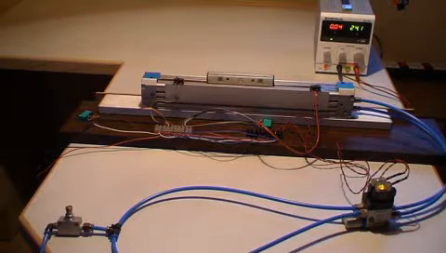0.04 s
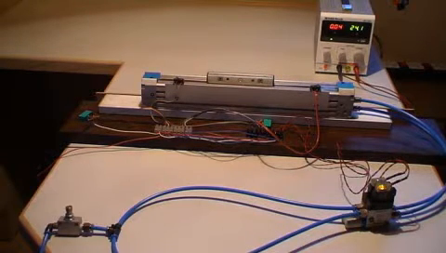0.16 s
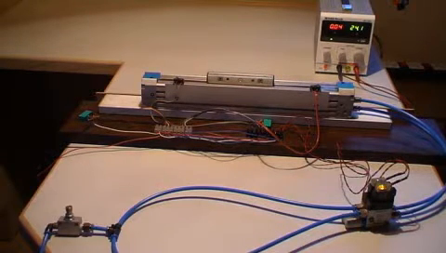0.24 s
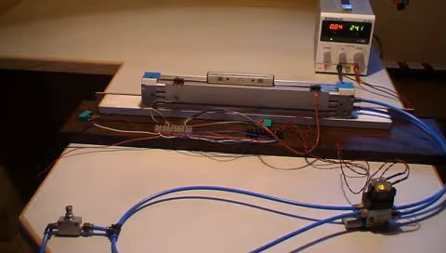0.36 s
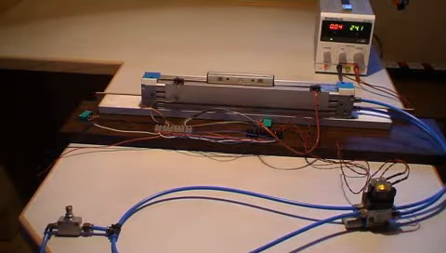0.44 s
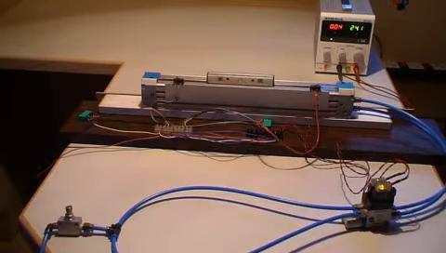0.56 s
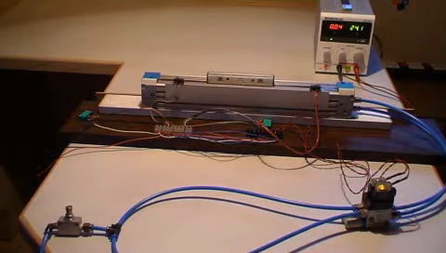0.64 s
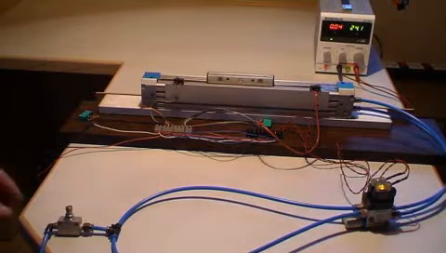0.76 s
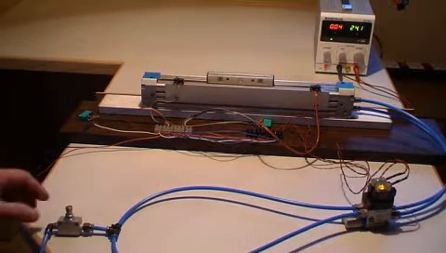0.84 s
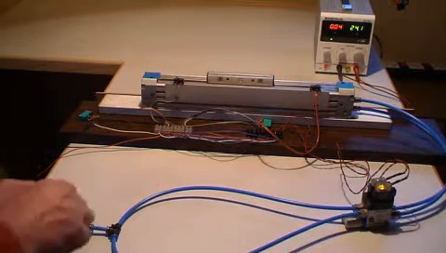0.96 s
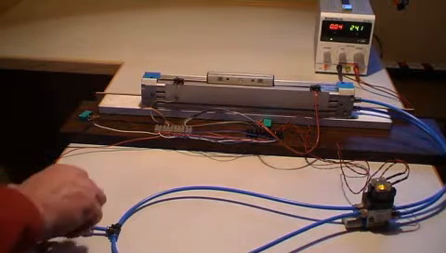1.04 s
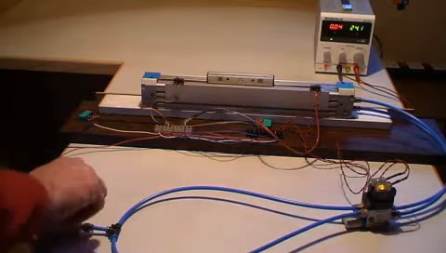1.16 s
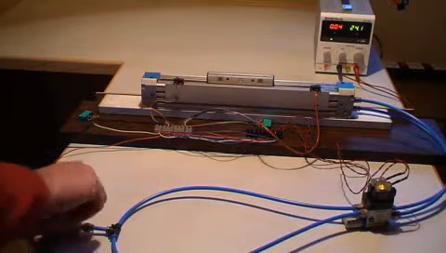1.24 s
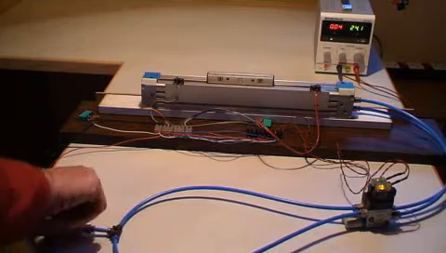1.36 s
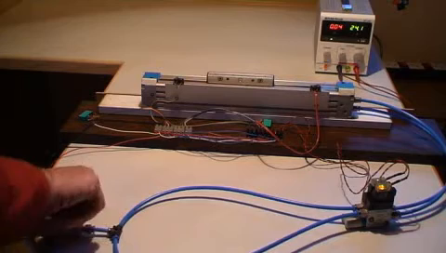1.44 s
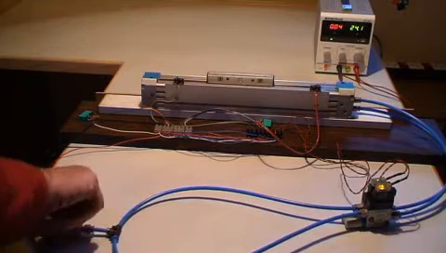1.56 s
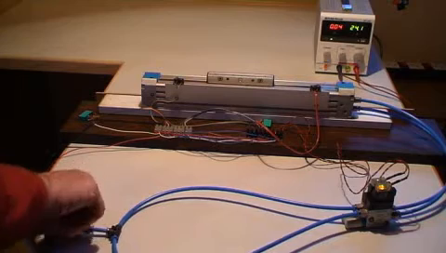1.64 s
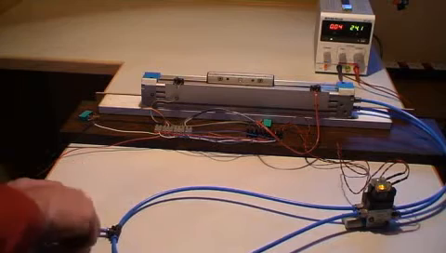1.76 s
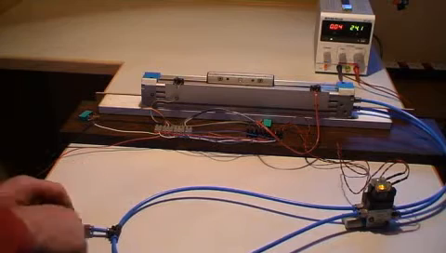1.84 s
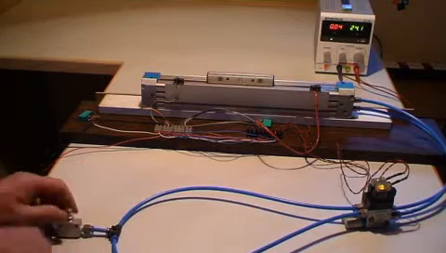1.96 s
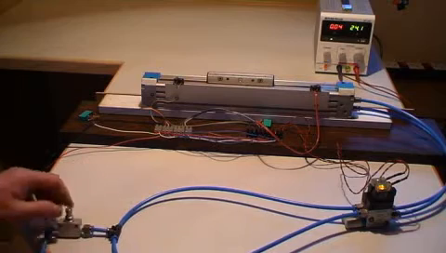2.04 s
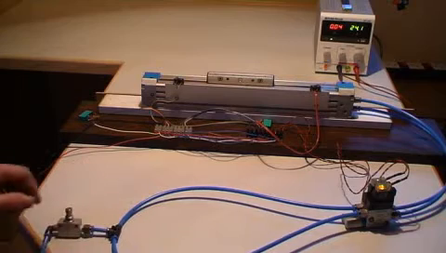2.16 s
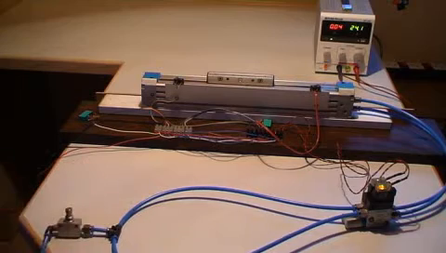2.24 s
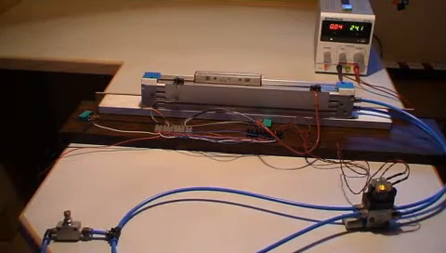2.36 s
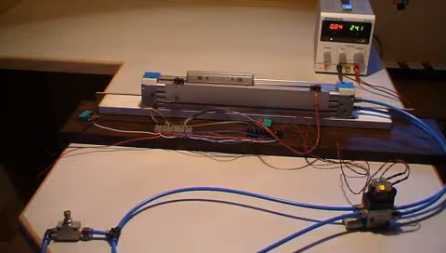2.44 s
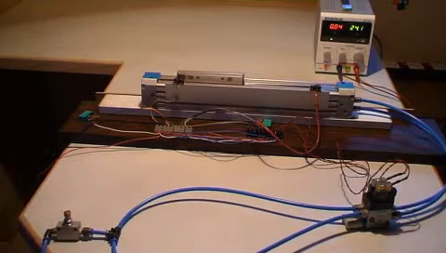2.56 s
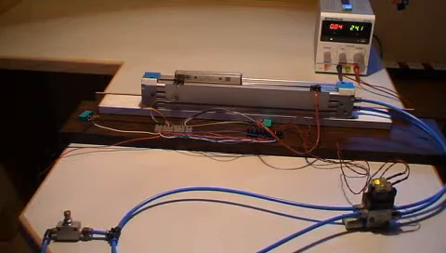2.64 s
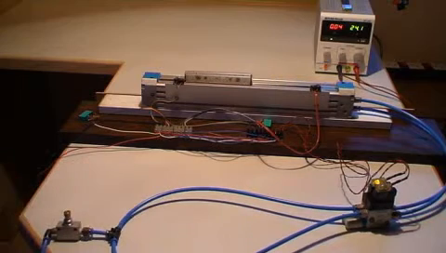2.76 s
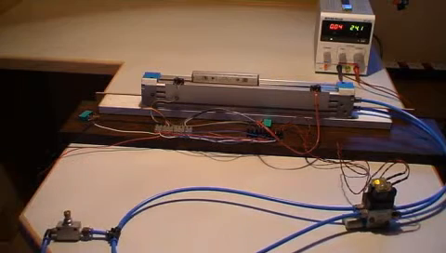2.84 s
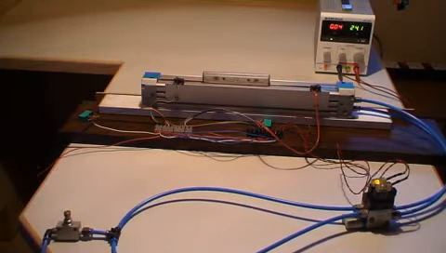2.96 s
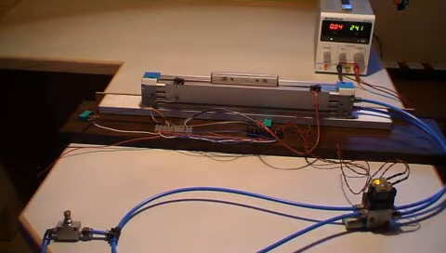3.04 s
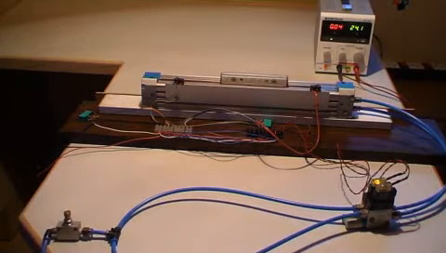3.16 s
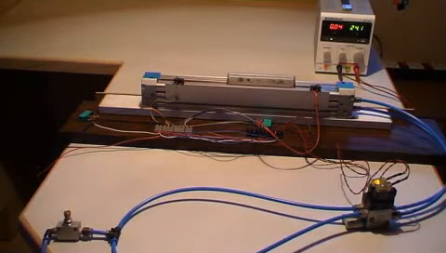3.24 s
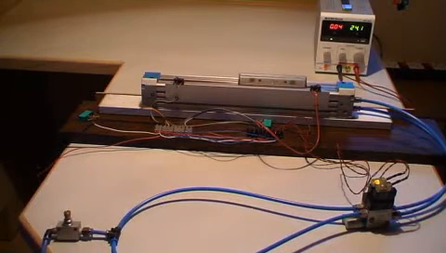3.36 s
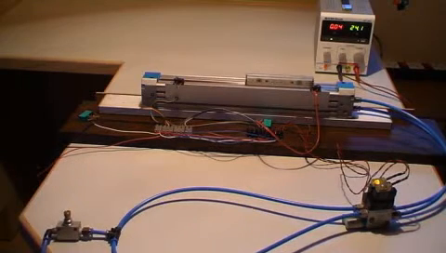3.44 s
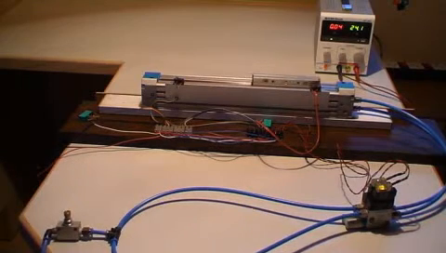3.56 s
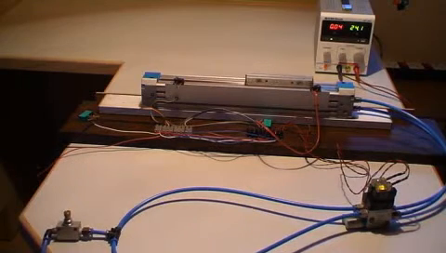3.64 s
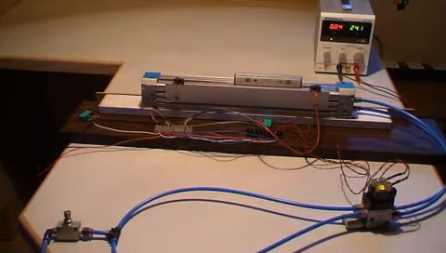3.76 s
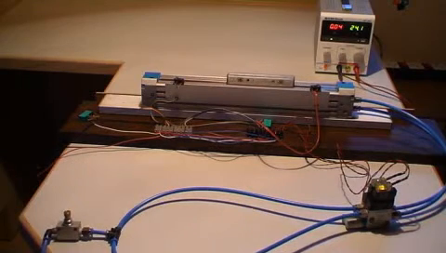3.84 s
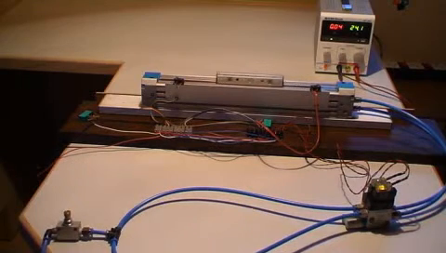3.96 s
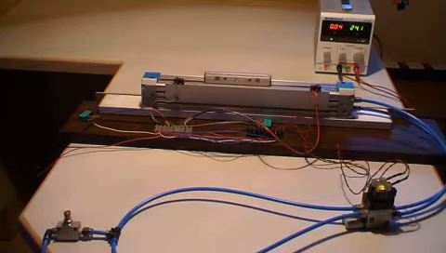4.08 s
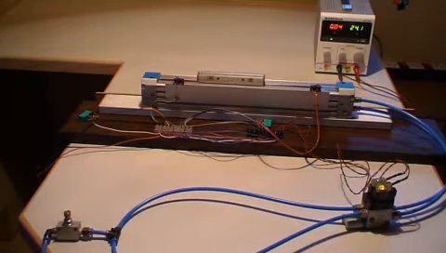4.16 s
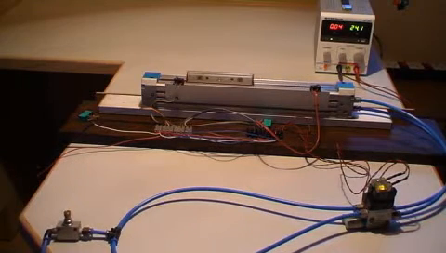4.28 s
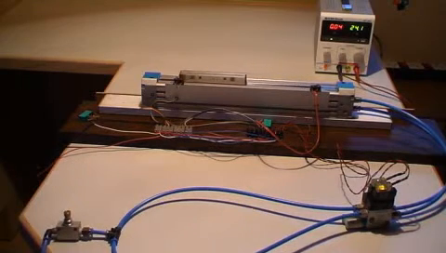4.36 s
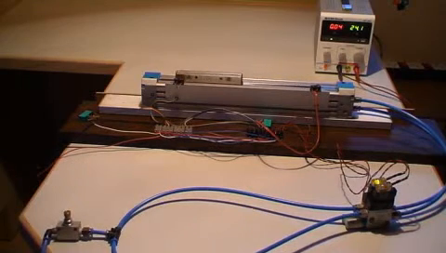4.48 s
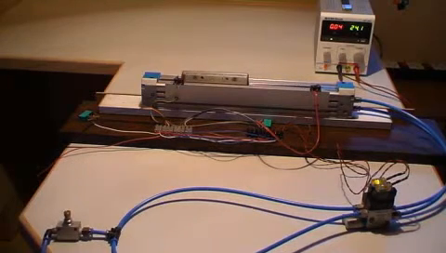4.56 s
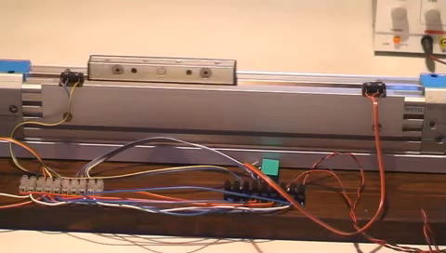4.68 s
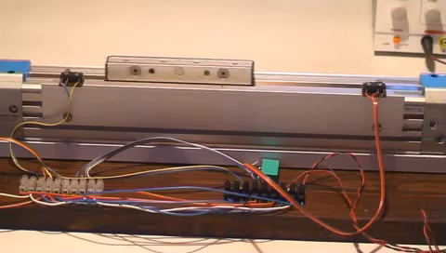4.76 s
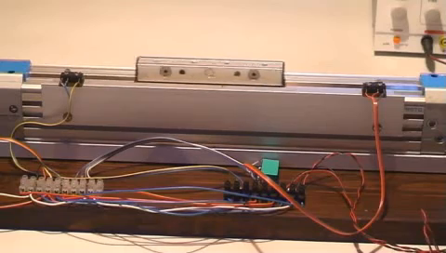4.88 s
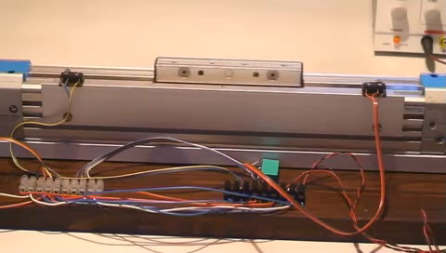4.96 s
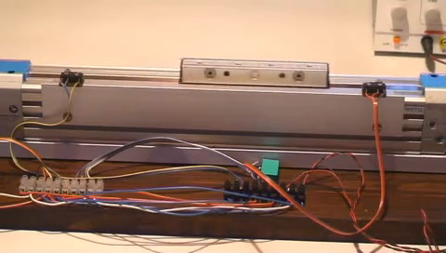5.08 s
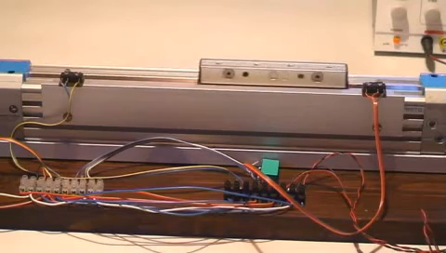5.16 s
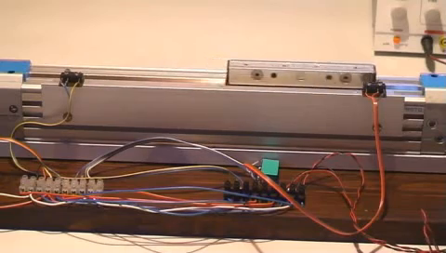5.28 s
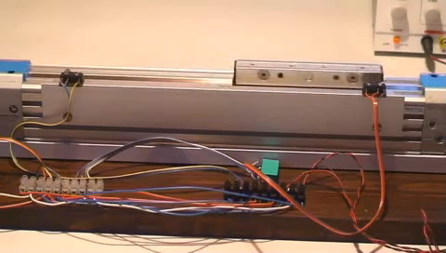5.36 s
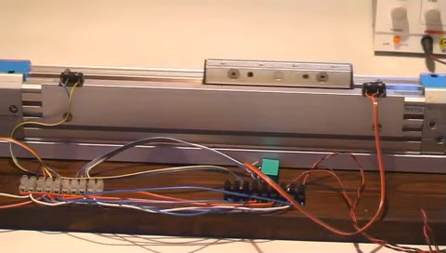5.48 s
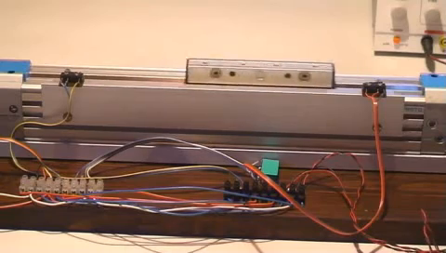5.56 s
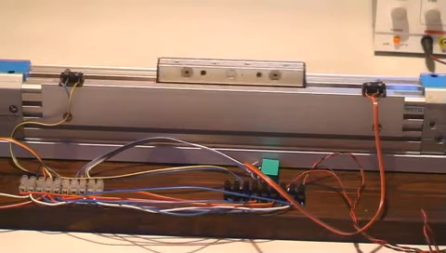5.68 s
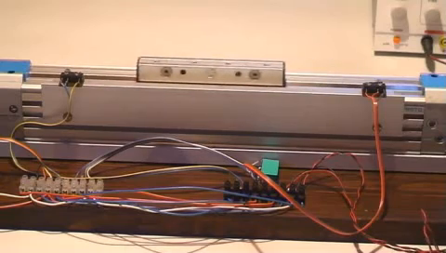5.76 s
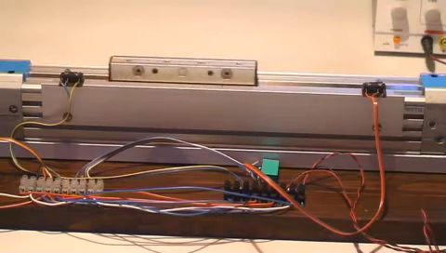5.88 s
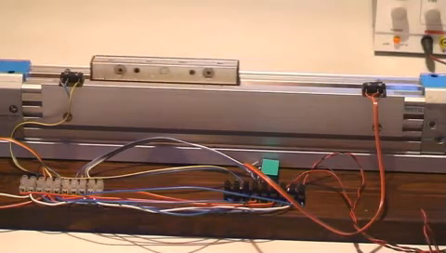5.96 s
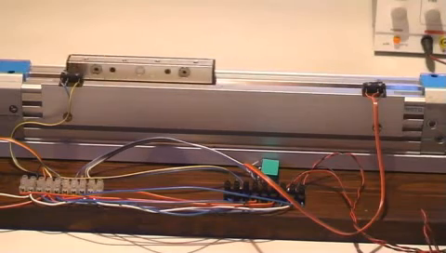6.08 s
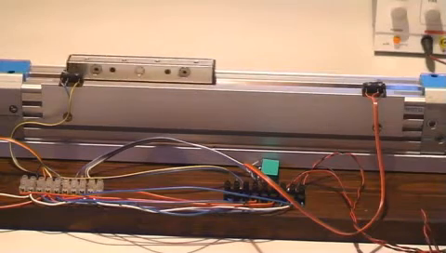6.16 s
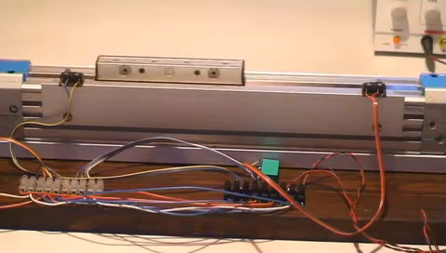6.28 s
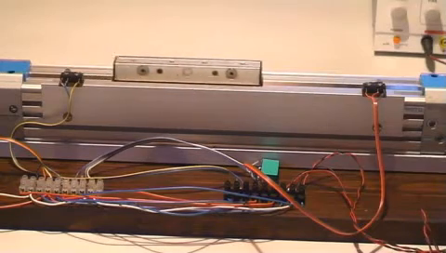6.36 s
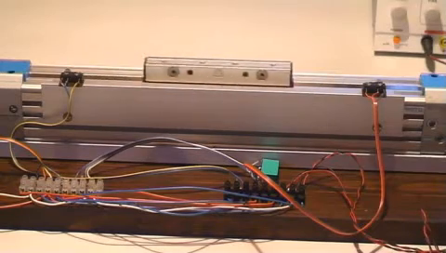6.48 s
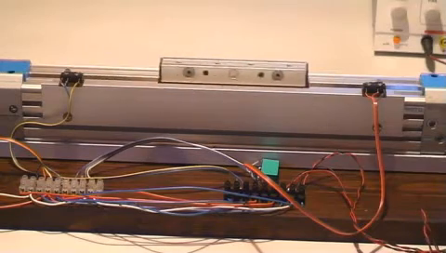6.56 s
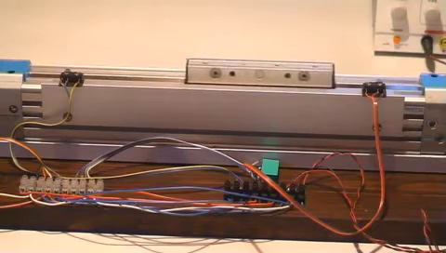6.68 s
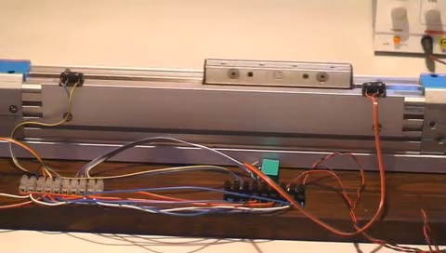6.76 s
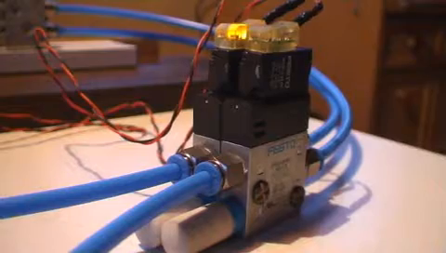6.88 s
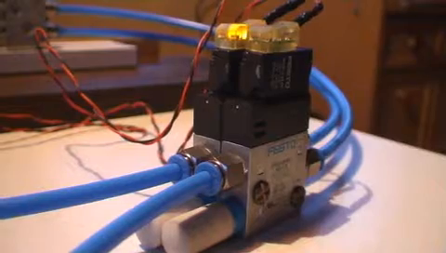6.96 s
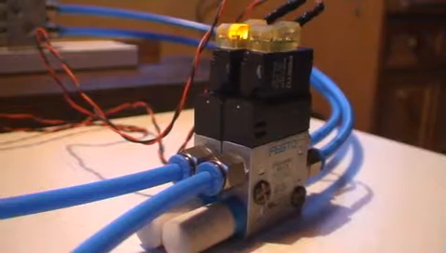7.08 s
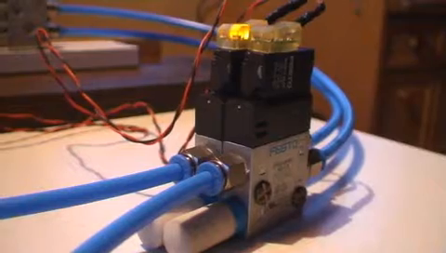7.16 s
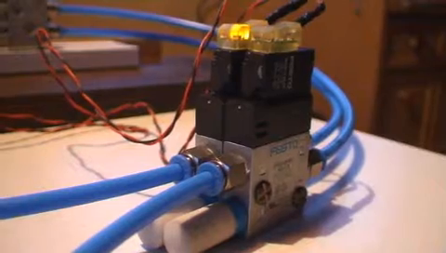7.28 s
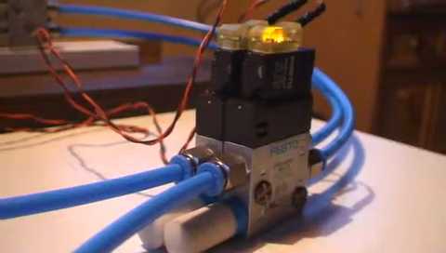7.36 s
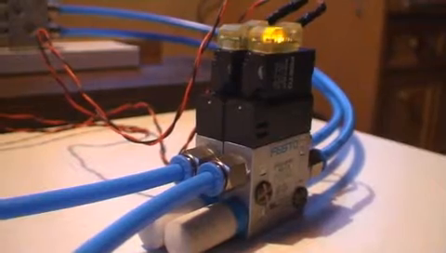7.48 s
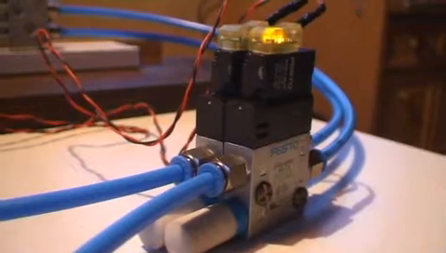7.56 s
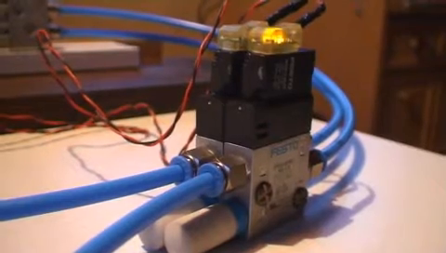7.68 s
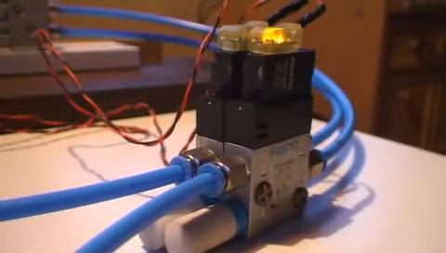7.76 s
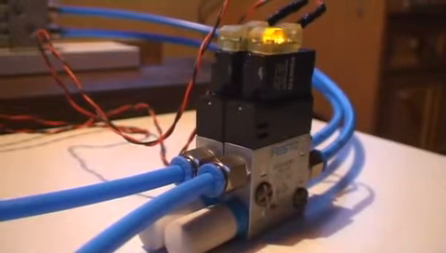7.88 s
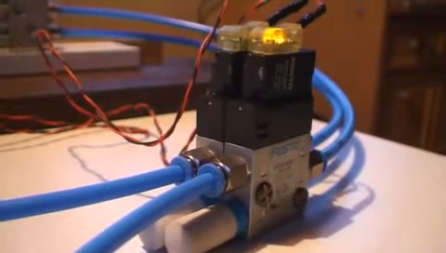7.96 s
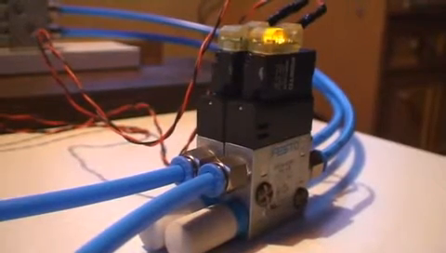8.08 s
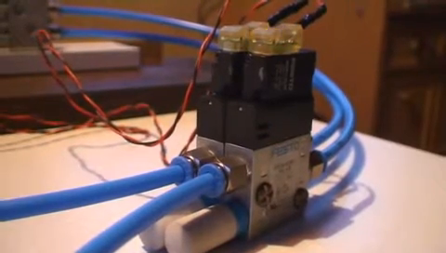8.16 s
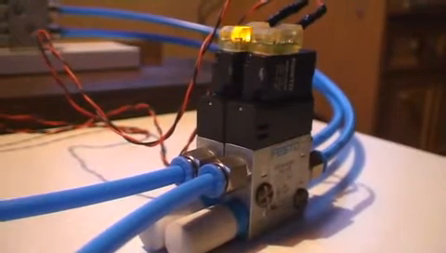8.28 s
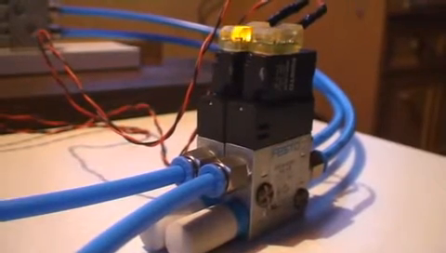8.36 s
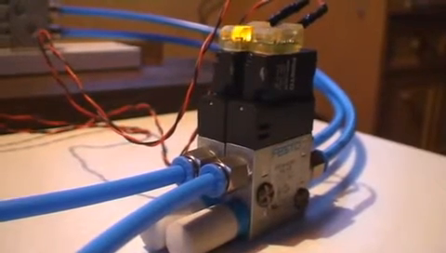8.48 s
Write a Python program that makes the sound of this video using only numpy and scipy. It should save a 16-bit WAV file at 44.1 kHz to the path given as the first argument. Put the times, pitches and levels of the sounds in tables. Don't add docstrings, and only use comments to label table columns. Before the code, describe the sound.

A bench pneumatic drive heard fairly close in a small room. After quiet fumbling on the microphone and two faint puffs, background hiss steps up and seven reversals follow in a steady rhythm. Each is a tight cluster of metallic ticks, a hollow thump and a quick, sputtering air exhaust that shakes the bench, ending with a crisp double click. Alternate ends differ slightly in resonance; the hiss is broad and out of phase.

```python
import sys
import numpy as np
from scipy import signal
from scipy.fft import rfft, irfft, next_fast_len
from scipy.io import wavfile

SR = 44100
rng = np.random.default_rng(int(sys.argv[2]) if len(sys.argv) > 2 else 0)


def store_pcm(level_fs):
    pcm = np.round(np.clip(level_fs, -1, 1) * 32767).astype(np.int16)
    wavfile.write(sys.argv[1], SR, np.atleast_2d(pcm).T)


def invert_db(level):
    return 10 ** (np.asarray(level, dtype=float) / 20)


N = 376173
TIME = np.arange(N) / SR
BANDS_HZ = 60 * 2 ** np.arange(0, 8.1, .5)

# spool_s, vent_s
REVERSALS = [
    (2.603, 2.6395),
    (3.545, 3.574),
    (4.446, 4.472),
    (5.398, 5.427),
    (6.323, 6.3495),
    (7.299, 7.329),
    (8.247, 8.274),
]
# spool_db, vent_db
STRENGTH = [
    (-36.5, -30),
    (-41, -32.5),
    (-38.5, -28.5),
    (-39.5, -32),
    (-39.5, -28),
    (-41, -31.5),
    (-38.5, -28),
]
# pitch_hz, level_db (per Hz)
LEFT_JET = [(60, -41), (150, -10), (300, -3), (600, -2), (1000, -5), (1500, -7), (2200, -0.5), (3500, -9.5),
            (5500, -13.5), (8000, -14.5), (11000, -17), (15000, -57)]
RIGHT_JET = [(60, -6), (150, -10), (350, 1.5), (600, -2.5), (1000, -13), (1500, -6), (2200, -1.5),
             (3500, -7), (5500, -15.5), (8000, -5.5), (11000, -27), (15000, -41)]
# pitch_hz, level_db (per Hz)
SPOOL_THUMP = [(60, -50), (300, 11), (700, -7), (1300, 6.5), (2500, -13.5), (5000, 3), (10000, 3.5),
               (15500, -25)]
# pitch_hz, rise_s, t60_s
JET_TIMES = [(80, 0.011, 0.17), (300, 0.0047, 0.46), (780, 0.02, 0.65), (2270, 0.012, 0.15),
             (4700, 0.0049, 0.36), (11800, 0.011, 0.042)]
# pitch_hz, width_hz, lift_db
LEFT_BODY = [(172, 5.7, 4), (308.7, 21, 8.5), (466, 14, 6.5), (587, 7.3, -18), (722, 30, 11), (1214, 54, 6),
             (1937, 33, 12.5), (2040, 143, 4), (2350, 140, 1.5), (3720, 210, 5.5)]
RIGHT_BODY = [(161.7, 5.3, 15), (280, 23, 7.8), (320.6, 5.7, 12.2), (374.5, 14, 7.5), (512, 35, 9.9),
              (850, 89, 14.9), (985, 3.8, 11.2), (1239, 81, 14.5), (1940, 480, 5.9), (4480, 52, 8.9)]

PARTS = {"armature": (6100, 9850, 3.2, 1.3), "rebound": (8300, 11040, 1, 2.3),
         "stop": (5500, 9600, -17, -0.2), "spring": (4200, 9200, -2, 0.5), "latch": (7100, 10600, -7, 1.8),
         "poppet": (7300, 10000, -10, 0.7), "seat": (3520, 10400, -11, 2),
         "left crack": (3200, 7040, 4.4, 0.43), "right crack": (5220, 7100, -6, 1.3),
         "left relay": (1800, 10500, -9, 4), "right relay": (1152, 7300, -25, 1.8),
         "pilot": (3500, 10800, -7, 12.5)}
# peak_db, part
LEAD_IN = [
    [(-35, "left relay")],
    [(-40, "right relay"), (-39, "pilot")],
]
LEAD_IN_S = [
    (.013,),
    (.0393, .0123),
]
# peak_db, part
PULL_IN = [
    [(-26, "armature"), (-28, "rebound"), (-20.5, "stop")],
    [(-25.5, "stop"), (-23, "rebound"), (-24.5, "stop")],
]
PULL_IN_S = [
    (.001, .0092, .0135),
    (.0003, .0088, .0128),
]
# peak_db, part
CRACK = [
    (-22.5, "left crack"),
    (-22.5, "right crack"),
]
# peak_db, part
DROP_OUT = [
    [(-27, "spring"), (-25.5, "latch")],
    [(-24, "poppet"), (-26.5, "seat")],
]
# first_s, second_s
DROP_OUT_S = [
    (.062, .1001),
    (.0417, .0782),
    (.0587, .097),
    (.046, .0789),
    (.0602, .0995),
    (.0481, .0797),
    (.061, .1027),
]
# start_s, peak_db, part
STRAY_BRIGHT = (4.577, -37, "latch")
STRAY_DULL = (2.548, -46, "right relay")

# start_s (from the spool), length_s, pitch_hz, width_hz, level_db
WHISTLES = [
    (-.038, 0.03, 1170, 650, -58),
    (-.036, 0.046, 5960, 650, -61),
    (0.122, .055, 4180, 300, -60),
]
# start_s, slowness (times the jet's own), level_db
FAR_PUFFS = [
    (.352, 1.6, -56.5),
    (1.32, 0.87, -50),
]
# pitch_hz, level_db (per Hz)
FAR_COLOURS = [
    [(100, -18), (500, -4), (1000, -0.5), (1600, -6), (4000, -17), (7500, -10), (12000, -23)],
    [(100, -33), (350, -2), (600, 0), (1300, -1), (1800, -8), (2400, -16), (4000, -26), (12000, -45)],
]
# pitch_hz, width_hz, lean (share toward the left)
CAPSULE_LEAN = [
    (5340, 3800, -0.24),
    (13200, 1700, 0.65),
]
# pitch_hz, t60_s
ROOM_T60 = [(100, 0.55), (500, 0.23), (2000, 0.42), (8000, 0.17)]
# start_s, height (signed), pitch_hz, out_of_phase_db
KNOCKS = [(0.1427, 0.0042, 300, 7), (.171, -0.00058, 900, 3), (.186, -0.0031, 400, 6),
          (0.2232, -0.0018, 500, 5), (0.2262, -0.0074, 368, 13), (0.2274, 0.00025, 500, 3),
          (0.2558, -0.0041, 2200, -6), (0.321, -0.0031, 1000, 5), (.385, 0.0043, 1000, 9),
          (0.509, 0.004, 1200, 7), (.704, 0.0043, 850, 8), (.736, 0.0025, 400, 4),
          (0.861, -0.00073, 600, -1), (.955, -0.0005, 600, 7), (1.349, 0.0011, 840, -9),
          (1.882, 0.0042, 700, 1), (2.201, 0.0029, 398, 13)]

# pitch_hz, level_db (per Hz)
MID_BEFORE = [(15, -50), (25, -20), (186, -5.5), (335, -4.5), (373, -4), (637, -7), (833, -6.5), (903, -7),
              (12800, -26), (15000, -67)]
MID_AFTER = [(15, -46), (25, -16.5), (219, -2.5), (749, -3), (811, 0), (952, -4.5), (3010, -11.5),
             (4150, -13.5), (9020, -19.5), (12800, -22), (15000, -36)]
# pitch_hz, level_db (per Hz)
SIDE_HISS = [(15, -65), (25, -41), (112, -6.5), (309, 0.5), (573, 0.5), (637, -2), (790, -1.5),
             (1460, -5.5), (11200, -33.5), (12400, -34), (15000, -55)]
# pitch_hz, width_hz, lift_db
CYLINDER_AIR = [(915, 25, -30.5), (4144, 25, 9), (9200, 200, 3.5)]
# start_s, in_phase_db, out_of_phase_db
HELD_HISS = [(0, -66, -57.5), (.13, -63, -50), (.27, -67, -56), (1.05, -65, -55), (1.35, -66.5, -56.5),
             (1.7, -65, -54.5), (2.0, -66, -56), (2.2, -65, -54), (2.29, -67.5, -57)]
# pitch_hz, level_db (per Hz)
PREAMP = [(500, 3), (3000, -2), (8000, -15), (12500, -9), (13600, -4), (15500, -8)]

SCENE_CHANGE_S = 2.358
BENCH_HISS_DB, BENCH_HISS_SIDE_DB = -58, -48
SWELL_DB, SWELL_SIDE_DB = 9, 0.9


def at_hz(points, hz, column=1):
    points = np.array(points)
    return np.interp(np.log(hz), np.log(points[:, 0]), points[:, column])


def rms_one(x):
    return x / np.sqrt(np.mean(x ** 2) + 1e-20)


def resonance(x, hz, width):
    r = np.exp(-np.pi * width / SR)
    feedback = [1, -2 * r * np.cos(2 * np.pi * hz / SR), r * r]
    return signal.lfilter([(1 - r * r) / 2, 0, (r * r - 1) / 2], feedback, x)


def with_peaks(x, peaks):
    for hz, width, lift_db in peaks:
        x = x + (invert_db(lift_db) - 1) * resonance(x, hz, width)
    return x


def place(track, s, piece):
    at = int(s * SR)
    out = np.zeros_like(track)
    out[at:at + len(piece)] = piece[:N - at]
    return out


def burst(spectrum, slowness, sputter_db):
    t, out = TIME[:int(.6 * SR)], 0
    white = rng.standard_normal((2, len(t)))
    sputter = np.repeat(rng.standard_normal(len(t) // 30), 30)
    white *= invert_db(sputter_db * sputter)
    steady_rms = np.sqrt(sum(invert_db(at_hz(spectrum, hz)) ** 2 * hz for hz in BANDS_HZ) / SR)
    for k, (low, high) in enumerate(zip(BANDS_HZ, BANDS_HZ[1:])):
        hz = np.sqrt(low * high)
        rise_s = at_hz(JET_TIMES, hz) * slowness
        t60_s = at_hz(JET_TIMES, hz, column=2) * slowness
        rise = np.sin(np.pi / 2 * np.minimum(t / rise_s, 1)) ** 2
        fall = invert_db(-60 * t / t60_s)
        band_filter = signal.butter(2, [low, high], "band", fs=SR, output="sos")
        band = signal.sosfilt(band_filter, white[k % 2])
        out = out + invert_db(at_hz(spectrum, hz)) * rise * fall * band
    return out / steady_rms


def reversals(end):
    out, t = np.zeros(N), TIME[:int(.01 * SR)]
    step = -np.sin(np.pi * np.minimum(t / 0.0016, 1)) ** 2
    knock = resonance(np.append(step, np.zeros(3000)), 678, 31)
    jet = [LEFT_JET, RIGHT_JET][end]
    habit = burst(jet, slowness=0.84, sputter_db=4.0)
    for (spool_s, vent_s), (spool_db, vent_db) in zip(REVERSALS[end::2], STRENGTH[end::2]):
        thump = burst(SPOOL_THUMP, slowness=0.62, sputter_db=2.0)
        out += invert_db(spool_db) * place(out, spool_s, thump)
        out += invert_db(spool_db + 19.5) * place(out, spool_s, knock)
        fresh = burst(jet, slowness=0.62, sputter_db=2.0)
        out += invert_db(vent_db) * place(out, vent_s, 0.89 * habit + 0.5 * fresh)
        out += invert_db(vent_db - 1.5) * place(out, vent_s, step)
    return with_peaks(out, [LEFT_BODY, RIGHT_BODY][end])


def sequence():
    bright, dull = [STRAY_BRIGHT], [STRAY_DULL]
    for k, ((spool_s, vent_s), drops_s) in enumerate(zip(REVERSALS, DROP_OUT_S)):
        end = k % 2
        bright += [(spool_s + s, *row) for s, row in zip(PULL_IN_S[end], PULL_IN[end])]
        bright += [(vent_s + s, *row) for s, row in zip(drops_s, DROP_OUT[end])]
        dull += [(spool_s - s, *row) for s, row in zip(LEAD_IN_S[end], LEAD_IN[end])]
        dull += [(vent_s + .007, *CRACK[end])]
    return bright, dull


def contacts(clicks, snap_db):
    out, t = np.zeros(N), TIME[:int(.03 * SR)]
    for (s, peak_db, part), white in zip(clicks, rng.standard_normal((len(clicks), len(t)))):
        low_hz, high_hz, high_db, chatter_ms = PARTS[part]
        chatter = white * np.minimum(t / 0.00045, 1) * np.exp(-1000 * t / max(chatter_ms, .2))
        low = resonance(resonance(chatter, low_hz, .35 * low_hz), low_hz, .35 * low_hz)
        high = resonance(resonance(chatter, high_hz, .2 * high_hz), high_hz, .2 * high_hz)
        snap = resonance(chatter, 5400, 11000)
        ring = low + invert_db(high_db) * high + invert_db(snap_db) * snap
        out[int(s * SR):][:len(t)] += invert_db(peak_db - 1.5) * ring / np.abs(ring).max()
    return out


def whistles():
    out, white = np.zeros(N), rng.standard_normal(N)
    for after_s, length_s, hz, width, level_db in WHISTLES:
        tone = rms_one(resonance(resonance(white, hz, width), hz, width))
        for spool_s, vent_s in REVERSALS[1::2]:
            progress = np.clip((TIME - spool_s - after_s) / length_s, 0, 1)
            out += invert_db(level_db) * tone * np.sin(np.pi * progress) ** 0.12
    return out


def far_puffs():
    out = np.zeros(N)
    for (s, slowness, level_db), colour in zip(FAR_PUFFS, FAR_COLOURS):
        out += invert_db(level_db) * place(out, s, burst(colour, slowness, sputter_db=2.5))
    return out


def capsules(x, lag_s, side_db):
    side = invert_db(side_db) * resonance(np.roll(x, int(lag_s * SR)), 5200, 13000)
    side += sum(share * resonance(x, hz, width) for hz, width, share in CAPSULE_LEAN)
    return np.array([x + side, x - side])


def room(x):
    t, tail = TIME[:int(.5 * SR)], 0
    mid, side = rng.standard_normal((2, len(t)))
    white = np.array([mid + .5 * side, mid - .5 * side])
    for low in 60 * 2. ** np.arange(8):
        octave = signal.butter(2, [low, 2 * low], "band", fs=SR, output="sos")
        band = signal.sosfilt(octave, white)
        fall = invert_db(-60 * t / at_hz(ROOM_T60, 1.15 * low))
        tail = tail + band * fall * np.minimum(t / 0.003, 1)
    tail /= np.sqrt(np.sum(tail ** 2, axis=1, keepdims=True))
    return signal.fftconvolve(x[None], tail, axes=1)[:, :N]


def handling():
    out, click = np.zeros((2, N)), np.eye(1, 400)[0]
    for s, height, hz, side_db in KNOCKS:
        knock = resonance(signal.lfilter([1], [1, -.6], click), hz, 0.72 * hz)
        knock *= height / np.abs(knock).max()
        balance = 1 + invert_db(side_db) * np.array([[1], [-1]])
        out[:, int(s * SR):][:, :len(click)] += knock * balance
    return out


def coloured(spectrum):
    size = next_fast_len(N)
    hz = np.maximum(np.fft.rfftfreq(size, 1 / SR), 10)
    shaped = rfft(rng.standard_normal(N), size) * invert_db(at_hz(spectrum, hz))
    return rms_one(irfft(shaped, size)[:N])


def drift(rate):
    knots = rng.standard_normal(int(N / SR * 60) + 3)
    return np.interp(TIME * rate, np.arange(len(knots)), knots)


def swell():
    tops_s = [vent_s + .1 for spool_s, vent_s in REVERSALS]
    return sum(np.interp(TIME - top_s, [-0.23, 0, 0.14], [0, 1, 0]) for top_s in tops_s)


def hiss():
    s, mid_db, side_db = np.transpose(HELD_HISS)
    held = TIME < SCENE_CHANGE_S
    ragged_db = np.where(held, 1.6, 1.1) * drift(55)
    mid_db = np.where(held, np.interp(TIME, s, mid_db), BENCH_HISS_DB + SWELL_DB * swell())
    side_db = np.where(held, np.interp(TIME, s, side_db), BENCH_HISS_SIDE_DB + SWELL_SIDE_DB * swell())
    mid = np.where(held, coloured(MID_BEFORE), rms_one(with_peaks(coloured(MID_AFTER), CYLINDER_AIR)))
    mid *= invert_db(mid_db + 0.46 * ragged_db)
    side = coloured(SIDE_HISS) * invert_db(side_db + ragged_db)
    left, right = mid + invert_db(2.1) * side, mid - invert_db(0.75) * side
    ports = signal.sosfilt(signal.butter(2, 11000, fs=SR, output="sos"), [left, right])
    both = ports + invert_db(-80.5 + np.where(held, 0, 6)) * coloured(PREAMP)
    return signal.sosfilt(signal.cheby2(10, 50, 16000, fs=SR, output="sos"), both)


def scene():
    left = reversals(end=0) + far_puffs()
    right = reversals(end=1) + whistles()
    bright, dull = sequence()
    ticks = contacts(bright, snap_db=-10) + contacts(dull, snap_db=-17)
    direct = capsules(left, 0.000975, -7.5) + capsules(right, 0.00106, -7.5)
    direct = direct + capsules(ticks, .0004, -19.0)
    spread = resonance(ticks, 6500, 11000)
    wet = invert_db(-7.5) * room(left) + invert_db(-7.5) * room(right) + invert_db(-6.0) * room(spread)
    low_cut = signal.butter(2, 92, "high", fs=SR, output="sos")
    heard = signal.sosfilt(low_cut, direct + wet)
    balance = invert_db([[.2], [-.2]])
    return heard * balance + handling() + hiss()


def roll_off(x):
    return signal.sosfilt(signal.butter(12, 16510, fs=SR, output="sos"), x)


def record(dry):
    dulled = signal.sosfilt(signal.cheby2(8, 45, 16300, fs=SR, output="sos"), dry)
    return roll_off(dulled)


dry = scene()
out = record(dry)
store_pcm(out)
```